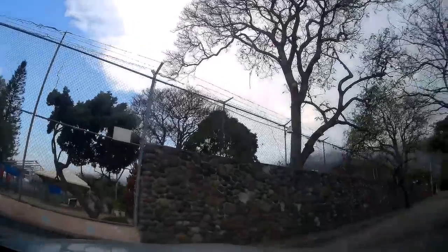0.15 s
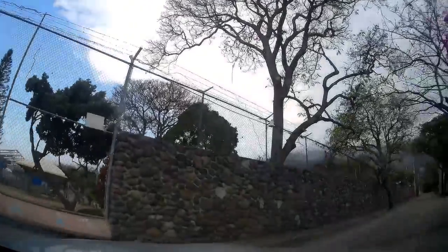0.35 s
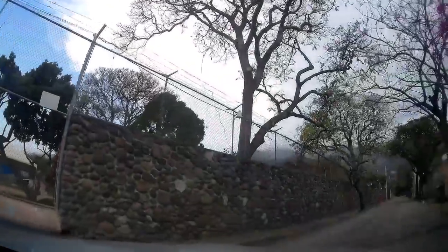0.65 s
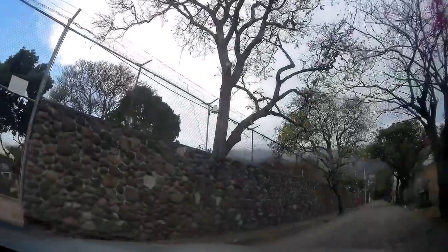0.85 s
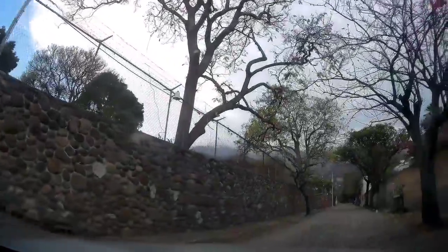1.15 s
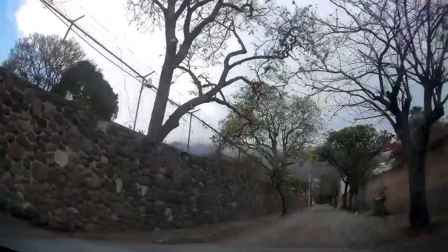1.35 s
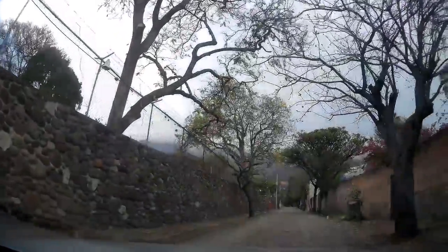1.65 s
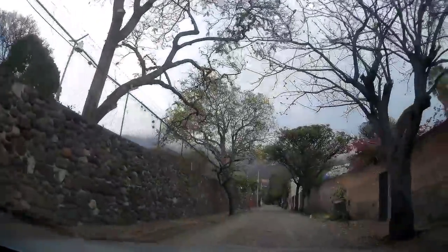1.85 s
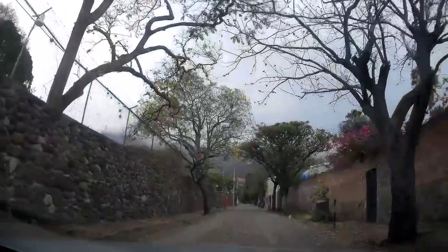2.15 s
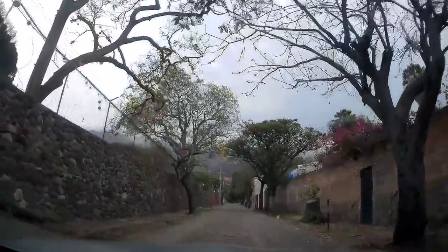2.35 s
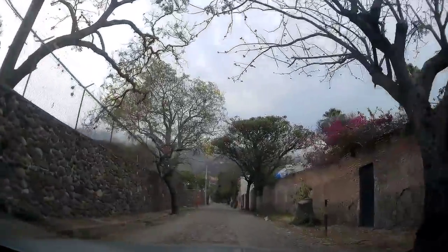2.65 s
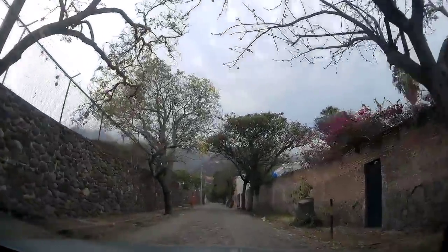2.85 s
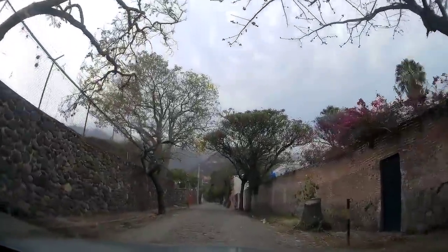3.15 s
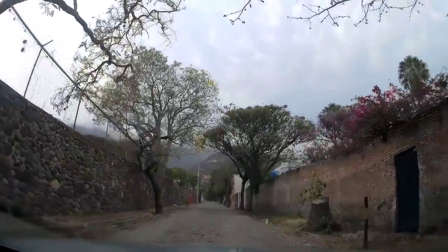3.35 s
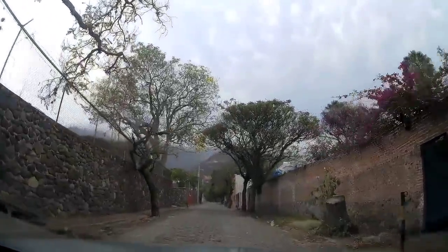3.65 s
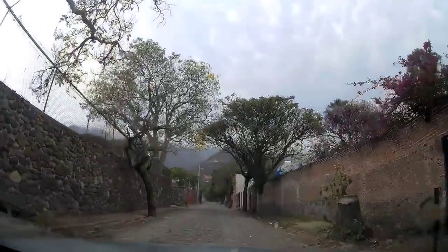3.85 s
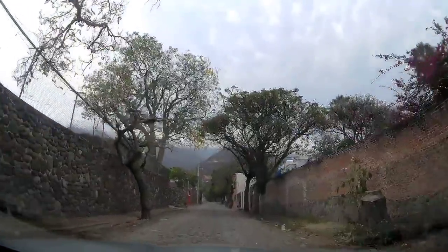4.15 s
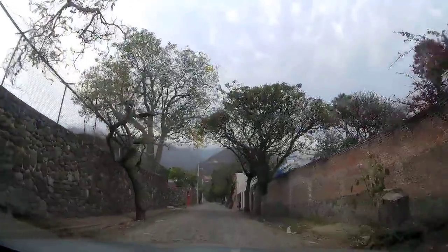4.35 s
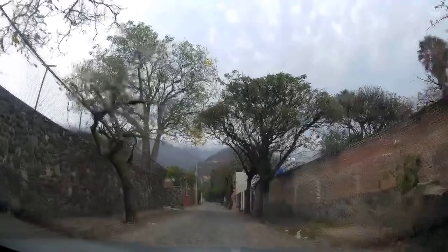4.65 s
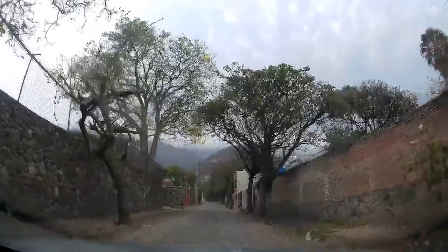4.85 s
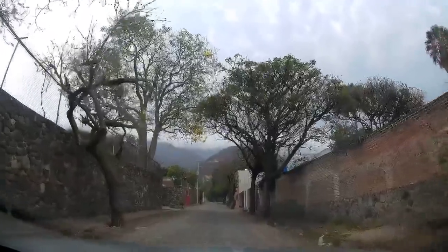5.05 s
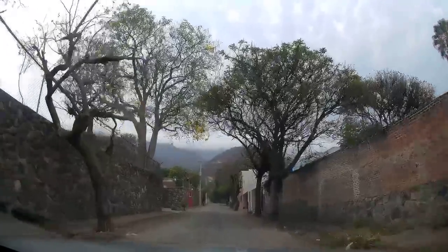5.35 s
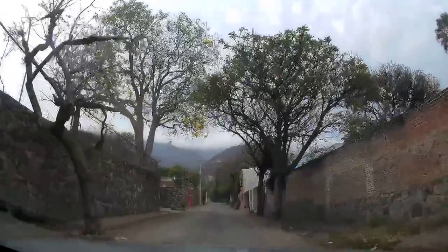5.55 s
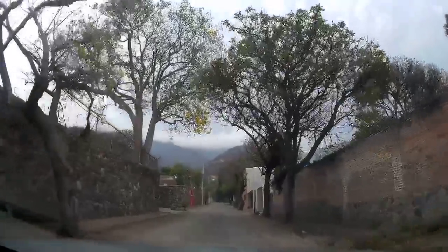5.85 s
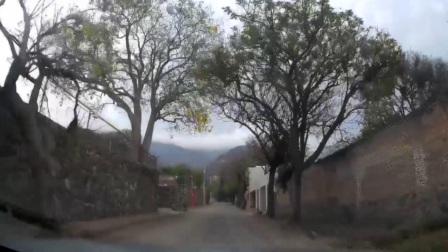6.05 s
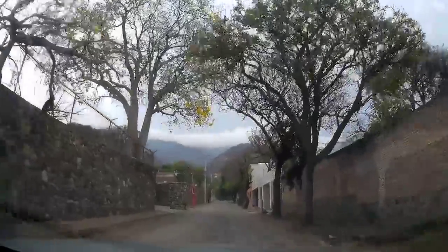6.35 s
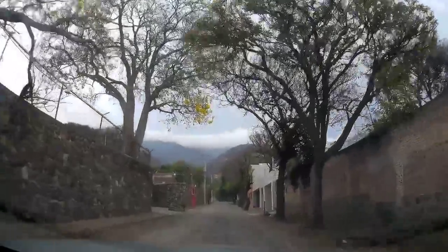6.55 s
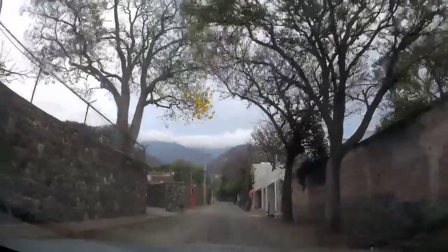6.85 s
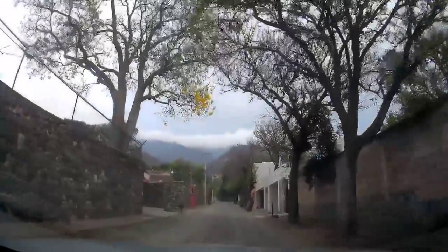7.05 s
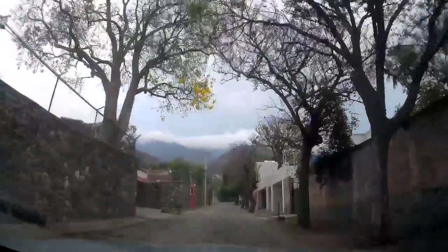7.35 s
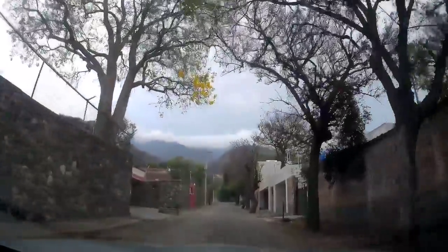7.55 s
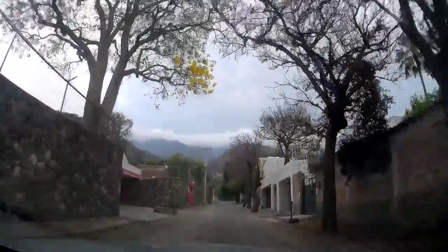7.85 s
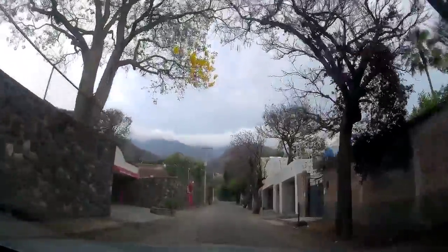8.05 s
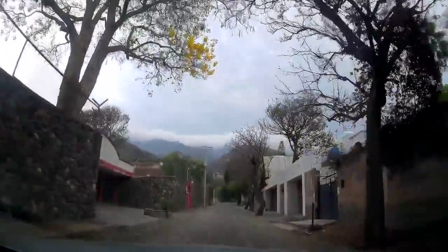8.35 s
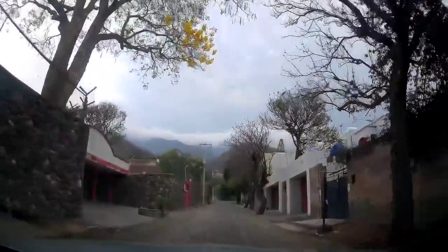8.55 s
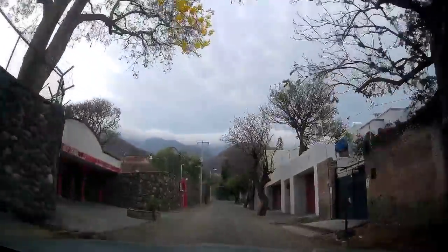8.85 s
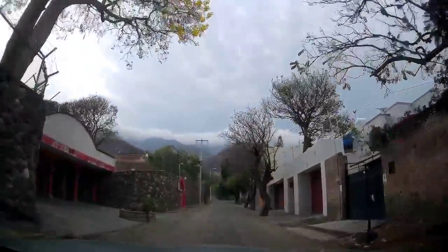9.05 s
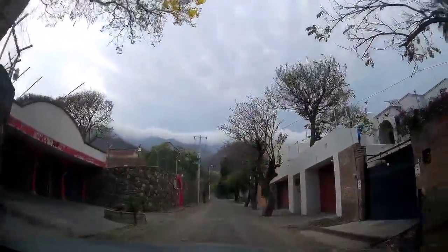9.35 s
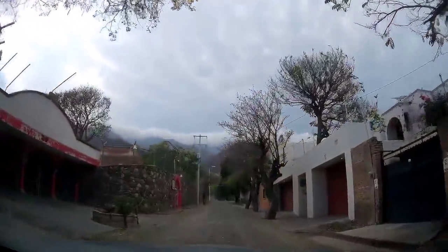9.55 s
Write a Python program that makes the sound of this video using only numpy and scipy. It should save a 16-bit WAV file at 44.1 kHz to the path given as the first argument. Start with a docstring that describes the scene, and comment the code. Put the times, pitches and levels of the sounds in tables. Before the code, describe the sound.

Heard from inside a small, dry car cabin on a cobbled lane. The tyres begin with a soft low rumble and steadily grow into dense drumming and rough roar as the car speeds up. Dashboard plastic snaps and buzzes, grit ticks, and small metal jingles. Heavy thumps come mostly in the second half, over a rising engine hum, faint whines and steady hiss.

```python
"""Tyres drum over cobbles and the cabin booms, heard inside a car that gathers speed: irregular impulses excite
shaped spectra. Deeper joints thump as single pushes; loose stones crunch as clusters of decaying sines.
Plastic trim snaps and chatters, grit ticks, and a small metal part jingles: impulses through resonant bodies.
Under it the engine hums as one sine, with two faint whines locked to its rate, over a steady filtered hiss."""
import sys
import numpy as np
from scipy import signal
from scipy.fft import rfft, irfft, next_fast_len
from scipy.io import wavfile
from scipy.ndimage import uniform_filter1d, map_coordinates

SR = 44100
rng = np.random.default_rng(int(sys.argv[2]) if len(sys.argv) > 2 else 0)


def unload_wav(signal):
    """Save mono or channel-first audio to the path in sys.argv[1] as 16-bit WAV at rate SR, clipped to [-1, 1]."""
    wavfile.write(
        sys.argv[1],
        SR,
        np.round(np.clip(np.atleast_2d(signal).T, -1, 1) * 32767).astype(np.int16),
    )


N = 427329  # samples


def amp(db):
    """Logarithmic level: decibels to linear gain."""
    return 10 ** (np.asarray(db) / 20)


def unit(x):
    """Normalisation by mean power: x scaled to rms 1."""
    return x / np.sqrt(np.mean(x ** 2) + 1e-20)


def curves(rows):
    """Linear interpolation in time: one value per sample for each column after t/s."""
    s, *cols = np.transpose(rows)
    return [np.interp(np.arange(N) / SR, s, c) for c in cols]


def wobble(rate):
    """Band-limited random modulation: a smooth curve through rate random knots a second."""
    knots = rng.standard_normal(int(N * rate / SR) + 4)
    return map_coordinates(knots, [np.arange(N) * rate / SR])


def filtered(x, response):
    """Linear filtering: the spectrum of x times a complex response of frequency."""
    size = 2 * next_fast_len(len(x) // 2 + SR // 8)
    return irfft(rfft(x, size) * response(np.fft.rfftfreq(size, 1 / SR)), size)[:len(x)]


def coloured(x, points):
    """Minimum phase: x through a causal body whose gain follows the (f/Hz, level/dB) points."""
    f, db = np.transpose(points)

    def response(hz):
        gain_db = np.interp(np.log(hz + 1), np.log(f + 1), db)
        cepstrum = irfft(np.log(amp(gain_db)))
        half = len(cepstrum) // 2
        # folding the cepstrum forward in time makes the response causal
        return np.exp(rfft(np.r_[cepstrum[0], 2 * cepstrum[1:half]], 2 * half))
    return filtered(x, response)


def rung(x, modes):
    """Modal superposition: x through parallel (f/Hz, width/Hz, level/dB) resonances of alternating sign."""
    def response(f):
        total = 0
        for k, (centre, width, db) in enumerate(modes):
            damping = 1j * f * width
            total = total + (-1) ** k * amp(db) * damping / (centre * centre - f * f + damping)
        return total
    return filtered(x, response)


def contacts(rate, scatter_db):
    """Random impulsive excitation: about rate impulses a second, of uneven size and either sign, with rms 1."""
    hits = rng.random(N) < rate / SR
    signs = rng.choice([-1, 1], N)
    return unit(hits * signs * amp(scatter_db * rng.standard_normal(N)))


def levelled(x, span):
    """Running power normalisation: x held near rms 1 over about span seconds, its quick grain kept."""
    width = int(span * SR) + 1
    power = uniform_filter1d(uniform_filter1d(x ** 2, width), width)
    return x / np.sqrt(np.abs(power) + 1e-12)


def add(track, s, sound):
    """Superposition: mix a sound into the track, in place, at s seconds."""
    part = track[max(round(s * SR), 0):][:len(sound)]
    part += sound[:len(part)]


START_SPEED = .5  # share of the top speed


def at_speed(level_db, speed):
    """Speed-dependent excitation: a level climbing linearly in dB from its starting to its top-speed value."""
    return np.interp(speed, [START_SPEED, 1], level_db)


def cabin(x, wet_db):
    """Diffuse reflection: glass and seats throw back a dense, very short reverberation."""
    t = np.arange(SR // 12) / SR
    tail = rng.standard_normal(len(t)) * amp(-60 * t / 0.21) * (t > .002)  # T60 of 0.21 s
    return x + amp(wet_db) * signal.fftconvolve(x, tail / np.linalg.norm(tail))[:N]


def knocks(rows, body):
    """Impulse response: single pushes at t/s, each ringing the body's spectrum up to its peak level/dB."""
    out = np.zeros(N)
    thud = coloured(signal.unit_impulse(SR // 5), body)
    for s, db in rows:
        add(out, s, amp(db) * thud / np.abs(thud).max())
    return out


# relative spectrum of the microphone's own hiss: f/Hz, level/dB
HISS_SPECTRUM = [(2000, 5.5), (5000, 2.5), (9000, 1.5), (13000, 4), (15000, -4)]


def microphone_hiss():
    """Stationary noise: the microphone's own noise, random and steady, with a shaped spectrum."""
    return amp(-58.5) * unit(coloured(rng.standard_normal(N), HISS_SPECTRUM))


# engine speed over time: t/s, firing rate f/Hz
FIRING_RATE = [(0, 28), (1.2, 38.2), (2.1, 48), (2.3, 49.8), (2.45, 50.4), (2.8, 53.1), (3.8, 59),
               (4.02, 58.8), (4.4, 60.7), (4.7, 63.1), (4.9, 63.4), (5.4, 65.2), (5.6, 65.2), (6.2, 67.2),
               (7, 68.9), (8, 73.4), (8.8, 77.6), (9.2, 80.1), (9.69, 82)]
# hum as the firing rate passes the cabin's resonances: firing rate f/Hz, rms level/dB
HUM_RESPONSE = [(28, -60), (39, -57), (48, -50), (53, -46), (59, -46), (64, -46), (72, -49), (75.5, -34),
                (77.5, -27), (79.5, -35), (82, -37)]
# body resonances and dead spots that the whines climb through: f/Hz, half-width/Hz, level change/dB
BODY_PEAKS = [(552, 10, 2), (584, 16, 2.5), (722, 22, 4), (768, 14, 3), (810, 15, -4), (847, 9, 6.5),
              (868, 6, -1), (903, 12, 13), (939, 7, 2), (968, 12, 4)]
HIGH_WHINE_ORDER, LOW_WHINE_ORDER = 14.4, 9  # multiples of the firing rate
# dB at starting and top speed, before the body peaks and the waver
HIGH_WHINE_DB, LOW_WHINE_DB = (-61.5, -55), (-76, -46.5)


def engine(speed):
    """Order-locked tones: the firing hum, and two unsteady whines from toothed parts geared to the crank."""
    hz, = curves(FIRING_RATE)
    unsteady_hz = hz * (1 + 0.0048 * wobble(35))
    phase = 2 * np.pi * np.cumsum(unsteady_hz) / SR

    def whine(order, level_db, waver_db):
        swell_db = 0
        for centre, half_width, db in BODY_PEAKS:
            swell_db = swell_db + db / (1 + ((order * hz - centre) / half_width) ** 2)
        return amp(at_speed(level_db, speed) + swell_db + waver_db) * np.sin(order * phase)

    hum_db = np.interp(hz, *np.transpose(HUM_RESPONSE)) + 0.67 * wobble(6.9)
    hum = amp(hum_db) * np.sin(phase)
    high_whine = whine(HIGH_WHINE_ORDER, HIGH_WHINE_DB, 2.0 * wobble(14))
    low_whine = whine(LOW_WHINE_ORDER, LOW_WHINE_DB, 2.5 * wobble(5))
    return np.sqrt(2) * (hum + high_whine + low_whine)  # sine amplitude from rms


# relative spectrum of the rattling trim: f/Hz, level/dB
TRIM_SPECTRUM = [(1100, -22.5), (1800, 4), (2250, -1.5), (2650, 6), (2850, 3), (3120, -3), (3600, -10.5),
                 (3950, -9), (4700, -16.5), (6500, -13), (11000, -100)]
# resonances of the small metal part: f/Hz, width/Hz, relative level/dB
METAL_MODES = [(4000, 490, 0), (5390, 310, 2.5), (6200, 1160, -6.5), (7050, 310, 1.5), (8000, 960, -3.5),
               (11000, 3300, -10), (12650, 430, -2.5), (13600, 690, -14)]
# flurries of metal taps: middle t/s, level at the middle/dB
FLURRIES = [(1.92, -59.5), (2.07, -60), (3.81, -55), (4.09, -55), (4.36, -55), (4.98, -55.5), (5.86, -51),
            (6.28, -56), (9.11, -50)]
FLURRY_S, FLURRY_RATE = 0.077, 280  # half-length (s) to 1/e of the middle amplitude; taps a second
TRIM_DB, METAL_DB = (-62, -43.5), (-68.5, -53.5)  # at starting and top speed


def loose_parts(speed, bumps):
    """Shaken contact: trim and a small metal part rattle harder with speed; in flurries the part hops in taps."""
    shaken = contacts(2200 * speed, scatter_db=1.5) * amp(3.9 * bumps)
    trim = unit(cabin(coloured(shaken, TRIM_SPECTRUM), wet_db=-7.5))
    jingle_hits = contacts(800 * speed, scatter_db=-1.0) * amp(1.0 * bumps + 3.5 * wobble(30))
    metal = levelled(cabin(rung(jingle_hits, METAL_MODES), wet_db=-11), span=.12)
    taps = rung(contacts(FLURRY_RATE, scatter_db=2), METAL_MODES)
    hops = levelled(cabin(taps, wet_db=-14), span=.08)
    t = np.arange(N) / SR
    flurries = np.zeros(N)
    for s, db in FLURRIES:
        flurries += amp(db) * np.exp(-np.minimum(((t - s) / FLURRY_S) ** 2, 20))
    steady = amp(at_speed(TRIM_DB, speed)) * trim + amp(at_speed(METAL_DB, speed)) * metal
    return steady + flurries * hops


# buzzes of a loose panel: t/s, level/dB (before an 18 dB cut), upper modes' level/dB, upper edge f/Hz
CHATTER = [(0.466, -30, 0.5, 3900), (.479, -38, -4, 2800), (0.5635, -31.5, -3, 3500),
           (0.577, -39, -12, 2500), (.6629, -38.5, 4, 3600), (0.728, -40, 0, 3800), (0.764, -44, 0, 4000),
           (1.013, -38, 1, 3300), (1.0907, -34, -4, 3500), (1.1524, -32, -2, 6000), (1.8876, -40, 8, 8000),
           (1.954, -35, 0, 6000), (2.111, -39, 7, 7000), (3.202, -34, -1, 6000),
           (3.4296, -31.5, -8.5, 4500), (3.81, -32, -12, 4000), (4.025, -30, -3, 4000),
           (5.826, -24, -10, 6000)]
# panel resonances, two low then two high: f/Hz, width/Hz, relative level/dB
PANEL_MODES = [(1210, 250, 11.5), (1670, 550, 8), (2700, 290, 10), (3040, 570, 5)]
CHATTER_RATE, CHATTER_FIRST = 2200, 1.5  # taps a second; size of the first tap against the others
CHATTER_T60_S = (.12, 0.092)  # decay of the taps that drive the low and the high resonances


def chatter():
    """Repeated impact: a panel bounces on its seat in a dense buzz that starts sharply and dulls as it dies."""
    out, t = np.zeros(N), np.arange(SR // 8) / SR
    for s, db, bright_db, edge_hz in CHATTER:
        taps = (rng.random(len(t)) < CHATTER_RATE / SR) * rng.choice([-1, 1], len(t))
        taps[0] = CHATTER_FIRST
        low_t60, high_t60 = CHATTER_T60_S
        low = rung(taps * amp(-60 * t / low_t60), PANEL_MODES[:2])
        high = rung(taps * amp(-60 * t / high_t60), PANEL_MODES[2:])
        lowpass = signal.butter(6, min(edge_hz, SR / 3), fs=SR, output="sos")
        buzz = signal.sosfilt(lowpass, low + amp(bright_db) * high)
        add(out, s, amp(db - 18.0) * unit(buzz))
    return out


# dashboard spectrum before each snap's own colour: f/Hz, relative level/dB
DASH_SPECTRUM = [(300, -17.5), (950, -11), (1550, 6), (2150, -3.5), (2780, 7.5), (3350, -4.5), (4100, -7.5),
                 (4800, -10.5), (5400, -3), (6600, -1.5), (8000, -16), (9200, -34), (14000, -53)]
SLIP_S, SLIP_SHARE = .0009, .55  # lead of the first slip over the snap, and its size against the snap
SCRAPE_SHARE, SCRAPE_T60_S = .06, .018  # size and decay of the rough scrape
REBOUND_DB, REBOUND_S = -17, (0.004, 0.013)  # size of the settling taps; span they fall in after the first slip
SPOT_OCT = .03  # greatest shift in pitch from snap to snap


def snap(hollow_db, brittle_db):
    """Stick-slip: plastic slips a little, lets go harder about a millisecond later, then settles; peak 1."""
    t = np.arange(SR // 30) / SR
    push = SCRAPE_SHARE * amp(-60 * t / SCRAPE_T60_S) * rng.standard_normal(len(t))
    push[0] += SLIP_SHARE
    push[round(SR * SLIP_S * rng.uniform(.96, 1.04))] -= 1
    rebounds = (SR * rng.uniform(*REBOUND_S, size=4)).astype(int) % len(t)
    push[rebounds] += amp(REBOUND_DB) * rng.standard_normal(size=4)
    spot = 2 ** (SPOT_OCT * rng.uniform(-1, 1))
    # hollowness lifts the points below 2 kHz, brittleness those above 4.5 kHz
    body = [(spot * hz, level + hollow_db * (hz < 2000) + brittle_db * (hz > 4500))
            for hz, level in DASH_SPECTRUM]
    sound = coloured(push, body)
    return sound / np.abs(sound).max()


# loud dry snaps of the dashboard: t/s, peak level/dB, hollowness/dB, brittleness/dB
LOUD_TICKS = [(.832, -32.5, 11, -6), (1.292, -27.5, -3, -8), (1.434, -32, -1, -2), (1.6834, -21, -3, -10),
              (2.297, -25.5, 2, -5), (3.1062, -27, -9, -10), (3.5117, -25.5, 1, -8), (3.6456, -27, 22, 5),
              (3.854, -28.5, 20, -9), (4.0878, -22.5, 4, 3), (4.1021, -23, 3, -8), (4.187, -27, 8, -3),
              (4.358, -25, 10, -5), (4.4864, -24.5, 12, -2), (4.644, -25, 11, -9), (5.1135, -23, 12, -5),
              (5.4914, -16.5, 1, -2), (5.7335, -20, 6, -5), (5.824, -19.5, 12, 5),
              (6.5948, -17.5, -3.5, -10), (6.901, -21, 16, -14), (7.1906, -18, 0, -7),
              (7.3195, -14, 1, -3.5), (7.561, -17, -1, -7), (8.245, -20, 2, -7), (8.311, -19, -4, -8),
              (8.523, -21, 2.5, -5), (8.897, -17.5, 18, 0), (9.2023, -14, -13, -10)]
# faint snaps: how many a second; middle peak dB at starting and top speed; scatter of that level
FAINT_TICK_RATE, FAINT_TICK_DB, FAINT_TICK_SCATTER_DB = 7, (-48, -26), 1
FAINT_COLOUR_DB, FAINT_COLOUR_SCATTER_DB = (5, -1.5), 2.5  # middle hollowness and brittleness; their scatter


def ticks(speed):
    """Strain release: the dashboard snaps as the body twists, loudly at set times and faintly at random."""
    out = np.zeros(N)
    for s, db, hollow_db, brittle_db in LOUD_TICKS:
        add(out, s, amp(db) * snap(hollow_db, brittle_db))
    for i in np.flatnonzero(rng.random(N) < FAINT_TICK_RATE / SR):
        db = at_speed(FAINT_TICK_DB, speed[i]) + FAINT_TICK_SCATTER_DB * rng.standard_normal()
        colour_db = np.array(FAINT_COLOUR_DB) + FAINT_COLOUR_SCATTER_DB * rng.standard_normal(2)
        add(out, i / SR, amp(db) * snap(*colour_db))
    return out


# chips of grit flung against the wheel arches: t/s, peak level/dB
CHIPS = [(.707, -37), (.768, -37), (1.115, -33), (1.708, -41), (1.881, -37), (1.917, -35), (2.111, -32),
         (2.2, -32), (2.57, -33), (3.244, -33), (3.353, -32), (3.491, -30), (3.532, -29), (3.571, -31),
         (3.715, -28), (3.777, -32), (4.12, -24), (4.379, -30), (4.991, -29), (5.26, -25), (6.29, -33),
         (6.87, -26), (6.962, -34), (7.02, -31), (7.24, -28), (7.605, -29), (8.058, -21), (8.371, -21),
         (8.434, -20), (9.228, -25), (9.55, -24)]
# wheel-arch spectrum before each chip's shift in pitch: f/Hz, relative level/dB
ARCH_SPECTRUM = [(500, -7), (1300, 8), (2000, 2), (2800, 6), (4500, -13), (7000, -18), (12000, -26)]
CHIP_OCT = .2  # greatest shift in pitch from chip to chip


def chips():
    """Damped impact: each chip of grit gives one dry, dead tick at its own pitch."""
    out = np.zeros(N)
    for s, db in CHIPS:
        pitch = 2 ** (CHIP_OCT * rng.uniform(-1, 1))
        out += knocks([(s, db)], [(pitch * hz, level) for hz, level in ARCH_SPECTRUM])
    return out


CLACK_CYCLES = 16  # a clack falls 60 dB within this many cycles


def clacks(starts, hz, spread_oct, scatter_db, size):
    """Damped oscillation: stone meets stone at the given samples, each a brief ring of its own pitch and size."""
    t = np.arange(SR // 30) / SR
    pitch, strength, side = rng.standard_normal((len(starts), 3)).clip(-2, 2).T[:, :, None]
    cycles = hz * 2 ** (spread_oct * pitch) * t
    envelope = amp(scatter_db * strength - 60 * cycles / CLACK_CYCLES) * (1 - np.exp(-2 * cycles))
    rings = np.sign(side) * envelope * np.sin(2 * np.pi * cycles)
    places = starts[:, None] + np.arange(len(t))
    return np.bincount(places.ravel(), rings.ravel(), size)[:size]


# loose stones shifting under a tyre: t/s, length/s, level before reverberation/dB, middle pitch f/Hz
CRUNCHES = [(0.464, 0.042, -44, 460), (0.698, 0.061, -42, 473), (0.707, 0.067, -51, 1200),
            (0.908, 0.046, -44, 437), (1.101, .03, -48, 1300), (1.153, .04, -48, 1050),
            (1.169, 0.079, -47, 486), (1.88, 0.078, -41, 510), (2.143, 0.054, -42, 496),
            (2.557, 0.19, -48.5, 1290), (2.677, 0.048, -40, 460), (3.185, 0.04, -38.5, 506),
            (3.418, 0.034, -52, 1210), (3.543, 0.035, -56, 1240), (4.015, 0.046, -39, 443),
            (4.307, .09, -35.5, 446), (5.814, 0.052, -35.5, 1300), (5.83, .07, -31, 455),
            (6.245, 0.11, -45, 397), (7.448, 0.029, -30, 397), (8.183, 0.031, -29, 423),
            (8.634, 0.06, -29.5, 1080), (8.721, .05, -30.5, 1130), (9.099, 0.028, -24.5, 1280)]
CRUNCH_RATE, CRUNCH_PITCH_OCT, CRUNCH_SCATTER_DB = 260, 0.18, 4.5  # clacks a second, spread of pitch and size
# grit: clacks a second at top speed, middle pitch, spread of pitch and size
GRIT_RATE, GRIT_HZ, GRIT_PITCH_OCT, GRIT_SCATTER_DB = 170, 1200, .4, 3
GRIT_DB = (-60, -42)  # at starting and top speed, before reverberation


def gravel(speed):
    """Granular superposition: grit clacks under the tyres all along, and loose stones shift in tight clusters."""
    starts = np.flatnonzero(rng.random(N) < GRIT_RATE * speed / SR)
    grit = unit(clacks(starts, GRIT_HZ, GRIT_PITCH_OCT, GRIT_SCATTER_DB, size=N))
    out = amp(at_speed(GRIT_DB, speed)) * grit
    for s, length, db, hz in CRUNCHES:
        starts = np.r_[0, rng.random(int(CRUNCH_RATE * length)) * length * SR].astype(int)
        cluster = clacks(starts, hz, CRUNCH_PITCH_OCT, CRUNCH_SCATTER_DB, size=SR // 5)
        add(out, s, amp(db) * cluster * np.sqrt(length * SR) / np.linalg.norm(cluster))
    return cabin(out, wet_db=-13)


# deep joints in the paving: t/s, peak level/dB before a 1.5 dB cut
JOLTS = [(.915, -23), (1.526, -25), (2.173, -22), (2.5, -21), (4.029, -14), (4.871, -18), (5.394, -19),
         (5.814, -7), (5.826, -5.5), (5.859, -9), (6.222, -8.5), (6.282, -14), (6.873, -10), (7.013, -9.5),
         (7.946, -22), (8.424, -10), (8.733, -16), (9.02, -18), (9.116, -16), (9.454, -3), (9.544, -13)]
# single stones that knock a tyre: t/s, peak level/dB before a 5 dB cut
STONES = [(.411, -30), (1.904, -29), (2.113, -22), (2.173, -20), (3.202, -27), (3.465, -22), (3.645, -24),
          (3.854, -30), (4.486, -20), (5.628, -29), (5.684, -19), (5.975, -17), (6.962, -17), (6.997, -15),
          (7.013, -19), (7.074, -16), (7.828, -20), (8.372, -10.5), (8.896, -10), (9.124, -21),
          (9.277, -12)]
# cabin spectrum, which the tyres' drumming shares: f/Hz, relative level/dB
CABIN_SPECTRUM = [(50, -57), (88, -19.5), (120, 0), (163, 2), (205, -1.5), (228, -0.5), (268, -5),
                  (300, -3.5), (375, -5.5), (420, -12.5), (462, -12.5), (520, -25.5), (750, -36),
                  (1300, -100)]
# tread spectrum, which the tyres' roar shares: f/Hz, relative level/dB
ROAR_SPECTRUM = [(280, -20.5), (450, 1), (535, 0), (615, -3.5), (680, -3.5), (722, -1), (770, -3.5),
                 (830, -7.5), (920, -6), (1020, -7), (1200, -5.5), (1500, -9), (1750, -16), (2000, -22),
                 (2300, -20.5), (3600, -41)]


def jolts():
    """Impulsive excitation: a wheel drops into a joint and rings the cabin; a proud stone knocks the tyre."""
    return amp(-1.5) * knocks(JOLTS, CABIN_SPECTRUM) + amp(-5.0) * knocks(STONES, ROAR_SPECTRUM)


# rougher (+) and smoother (-) paving: middle t/s, length/s, boom change/dB, drumming change/dB, roar change/dB
PATCHES = [(0.153, 0.98, -5, -1.5, -3), (0.557, 0.42, 0, 0, 1.5), (1.16, 0.34, 1, 0, 5.5),
           (1.258, .08, 5, 5, 1), (1.6, 0.45, -2, -3, -2), (2.178, 0.69, 5, 2, 0.5),
           (2.38, 0.46, -2.5, -4.5, -1), (2.513, 0.1, 8.5, 8.5, 1.5), (2.94, .08, 6, 0.5, 1),
           (3.12, 0.087, 4, -3.5, -1), (3.37, 0.4, -2, -1.5, 0), (3.614, 0.11, -4, -3, -2),
           (3.98, 0.86, 4.5, 2.5, 1.5), (4.372, 0.1, 8.5, -0.5, 5), (4.886, 0.2, 0, 5, 1.5),
           (5.083, 0.1, 1, -6.5, 2), (5.247, 0.1, -9, -4, -1), (5.412, 0.23, 4.5, 5, 1),
           (5.74, .1, -1, 0.5, -0.5), (5.856, 0.24, 5.5, 7.5, 2.5), (6.11, 0.23, 6.5, 1, 0),
           (6.288, 0.13, 9, 6, 1.5), (6.68, 0.6, -5, -2.5, -2.5), (7.012, 0.33, 8.5, 1, 3.5),
           (7.15, 0.13, 3, -4.5, -7), (7.36, 0.26, -4, -3, -2), (7.69, 0.38, -9, -4.5, -3),
           (7.895, 0.094, -2, -7, 0.5), (8.12, 0.28, -1, -1.5, 0.5), (8.33, 0.054, 1, -3, -1),
           (8.667, 0.57, 2.5, 2.5, 3.5), (8.86, 0.071, -2, -3, -0.5), (8.987, 0.075, -6, -6.5, -2),
           (9.082, 0.34, 5, 3, 5), (9.35, 0.13, -9, 0, 0), (9.57, 0.088, 4, 3.5, 2)]


def paving():
    """Roughness modulation: decibels that stretches of paving add to boom, drum and roar, smoothly on and off."""
    t = np.arange(N) / SR
    lift_db = np.zeros((3, N))
    for s, length, *db in PATCHES:
        on = np.abs(t - s) < length / 2
        lift_db[:, on] += np.outer(db, np.cos(np.pi * (t[on] - s) / length) ** 2)
    return lift_db


STONE_PATCH_HZ, STONE_PATCH_S = 170, .035  # how far in pitch and time one stone colours the roar


def stone_coloured(x, depth_db):
    """Time-varying filtering: stones meet the tread differently, so the roar swells in one band, then another."""
    z = signal.stft(x, nperseg=512)[2]
    rows, cols = np.indices(z.shape)
    where = [rows * SR / 512 / STONE_PATCH_HZ, cols * 256 / SR / STONE_PATCH_S]
    knots = rng.standard_normal([int(w.max()) + 2 for w in where])
    field = map_coordinates(knots, where, order=1)
    return signal.istft(z * amp(depth_db * unit(field)), nperseg=512)[1][:N]


# spectrum of the low cabin boom: f/Hz, relative level/dB
BOOM_SPECTRUM = [(15, -41), (25, -30), (33, -18), (44, -6.5), (54, -6), (66, -6), (73, -10), (80, 5.5),
                 (90, -0.5), (108, -2), (122, 0), (132, -5), (200, -40), (400, -100)]
# dB at starting and top speed, before the paving's changes
BOOM_DB, DRUM_DB, ROAR_DB = (-43.5, -27), (-38, -17.5), (-49, -30)
UNEVEN_RATE, UNEVEN_DRUM_DB = 12, 0.58  # chance unevenness: knots a second, typical swing of the drumming
LUMPS_DB, LUMP_RATE = 2.5, 35  # blows in the roar: typical swing on the roughest paving, knots a second


def tyres(speed, bumps):
    """Forced vibration: stone edges strike more often and harder with speed; body and cabin air answer."""
    boom_lift, drum_lift, roar_lift = paving()
    boom_db = at_speed(BOOM_DB, speed) + boom_lift
    drum_db = at_speed(DRUM_DB, speed) + drum_lift + UNEVEN_DRUM_DB * wobble(UNEVEN_RATE)
    # the rougher the paving, the more the roar breaks into blows
    roughness = np.maximum(roar_lift, 0) / roar_lift.max()
    roar_db = at_speed(ROAR_DB, speed) + roar_lift + LUMPS_DB * roughness * wobble(LUMP_RATE)
    boom = levelled(coloured(contacts(400 * speed, scatter_db=1.5), BOOM_SPECTRUM), span=0.27)
    blows = coloured(contacts(650 * speed, scatter_db=1.5) * amp(0.44 * bumps), CABIN_SPECTRUM)
    # at low speed each blow is softer, so the upper resonances stay weaker
    soft = filtered(blows, lambda hz: 1 / (1 + (hz / 220) ** 4))
    drum = levelled(soft + amp(9.8 * (speed - 0.87)) * (blows - soft), span=0.15)
    # the tread slaps and scrubs on the stones
    slaps = coloured(contacts(2000 * speed, scatter_db=0.5) * amp(1.84 * bumps), ROAR_SPECTRUM)
    roar = levelled(stone_coloured(cabin(slaps, wet_db=-18), depth_db=2.2), span=.2)
    return amp(boom_db) * boom + amp(drum_db) * drum + amp(roar_db) * roar


def scene():
    """Superposition: all sources summed in the cabin, with speed rising evenly and shared bumps."""
    speed = np.linspace(START_SPEED, 1, N)
    bumps = 0.44 * wobble(28) + 0.48 * wobble(90)
    background = microphone_hiss() + engine(speed)
    plastic_and_metal = loose_parts(speed, bumps) + chatter() + ticks(speed)
    road = chips() + gravel(speed) + jolts() + tyres(speed, bumps)
    return (background + plastic_and_metal + road)[None]


TOP_HZ = 14850  # band limit


def record(dry):
    """Band limitation: the microphone loses the deepest bass, and nothing passes above the band limit."""
    def response(hz):
        return hz ** 4 / (hz ** 4 + 36 ** 4) * (hz < TOP_HZ)
    return np.array([filtered(x, response) for x in dry])


dry = scene()
out = record(dry)
unload_wav(out)
```